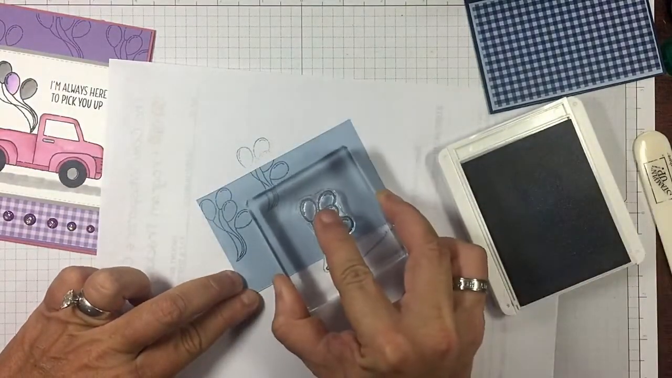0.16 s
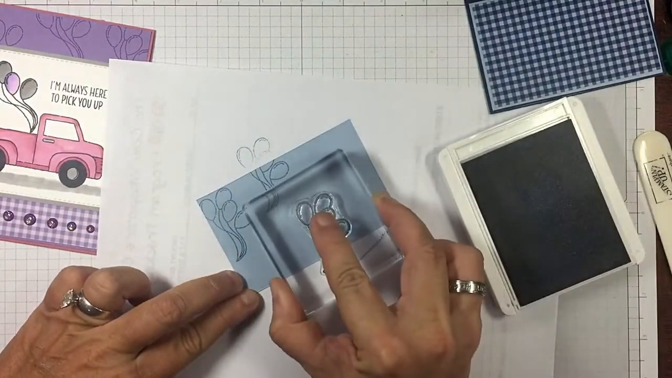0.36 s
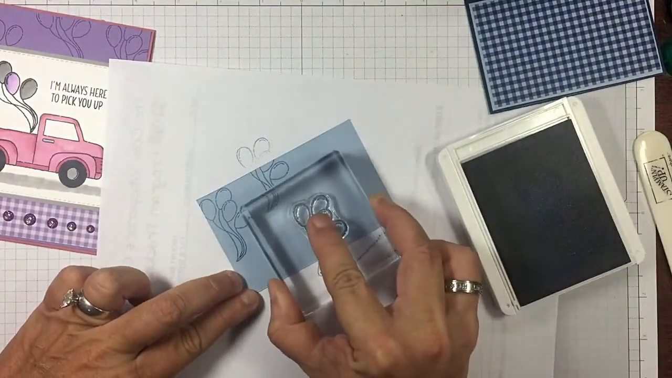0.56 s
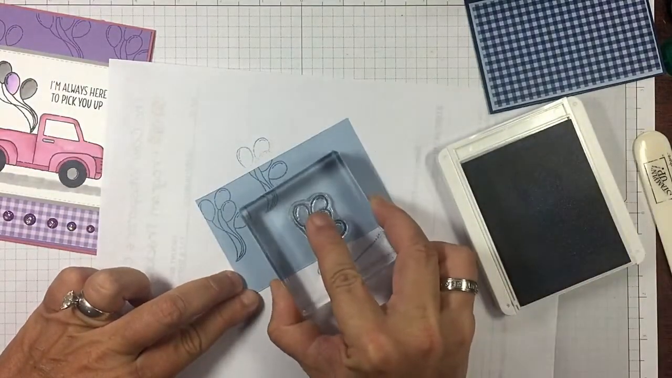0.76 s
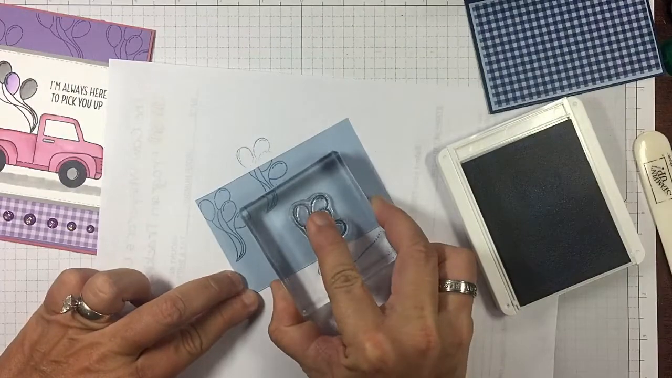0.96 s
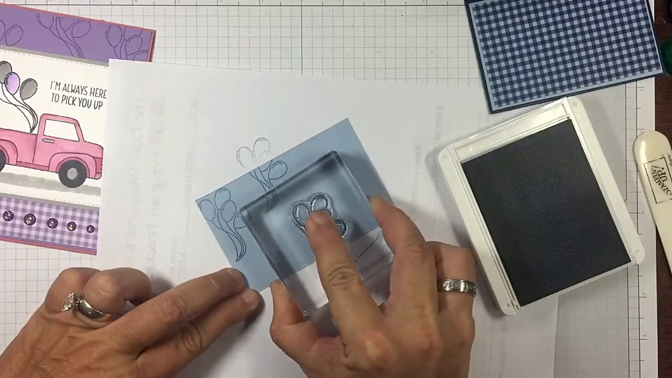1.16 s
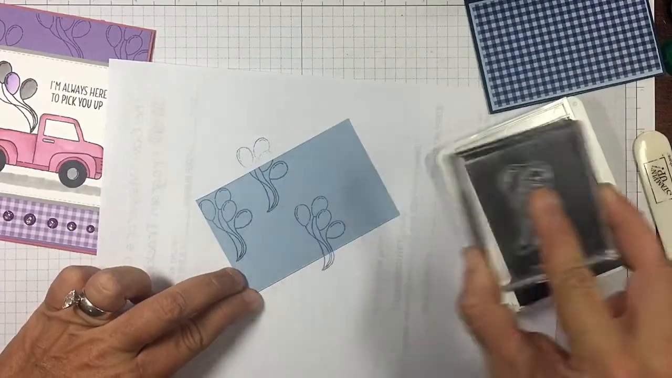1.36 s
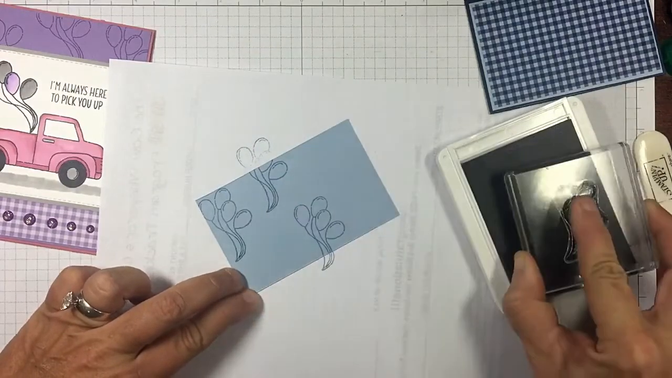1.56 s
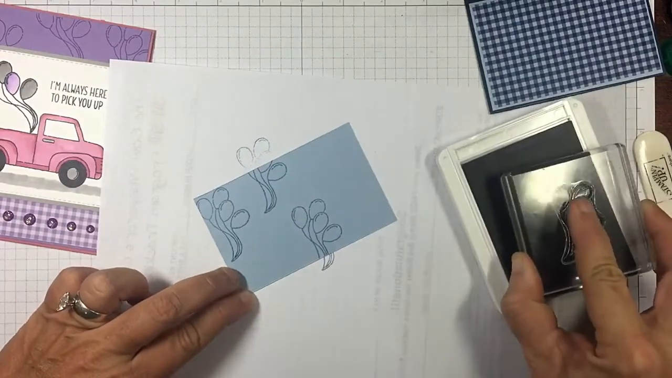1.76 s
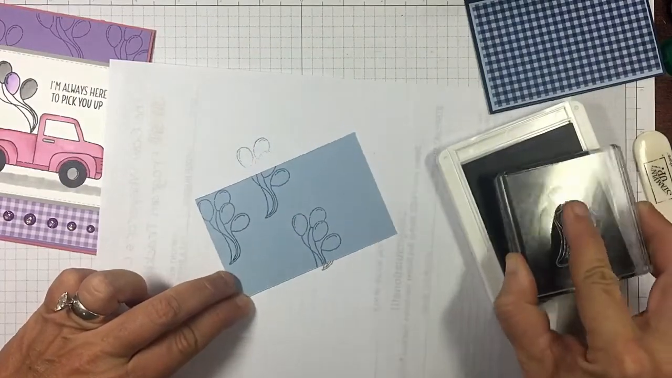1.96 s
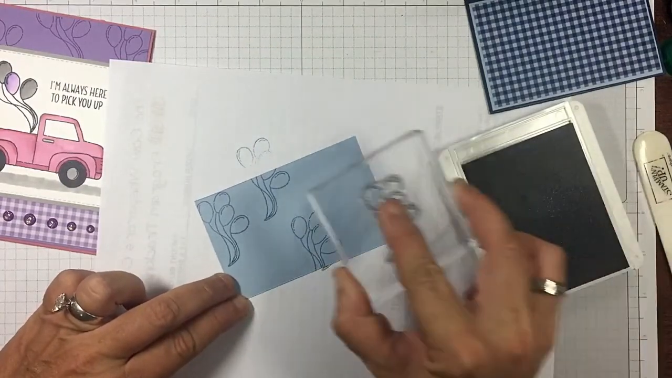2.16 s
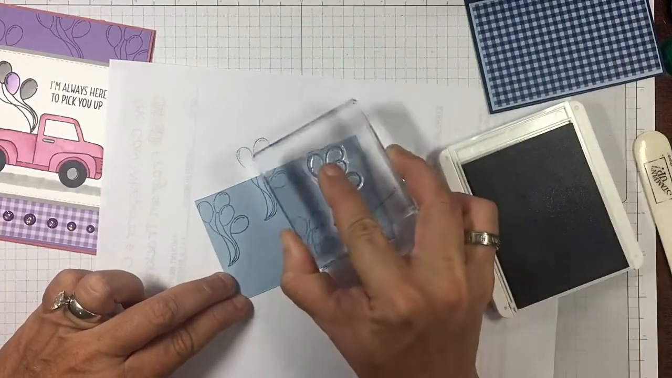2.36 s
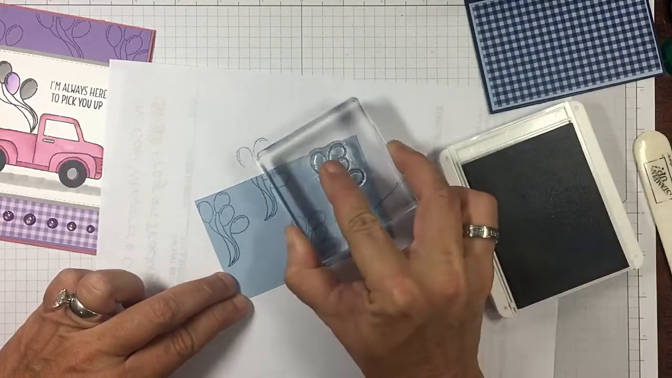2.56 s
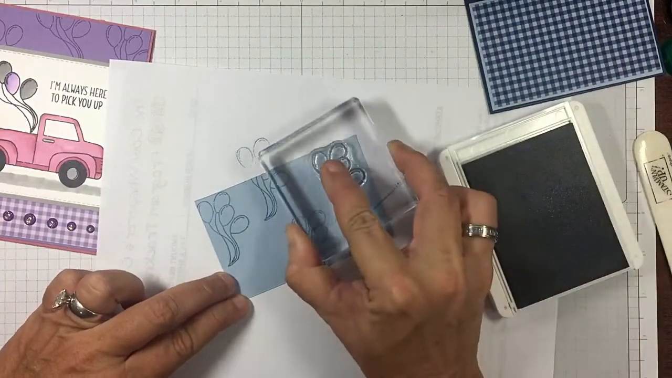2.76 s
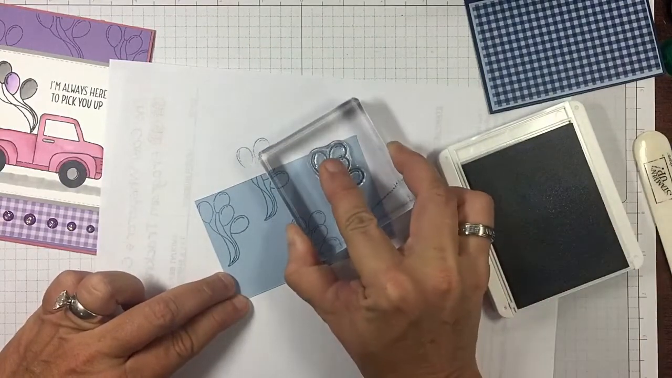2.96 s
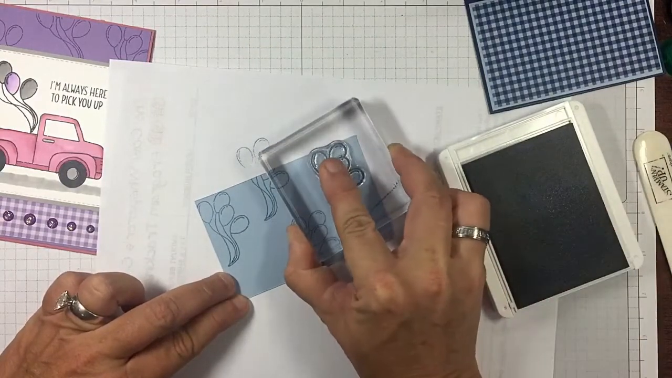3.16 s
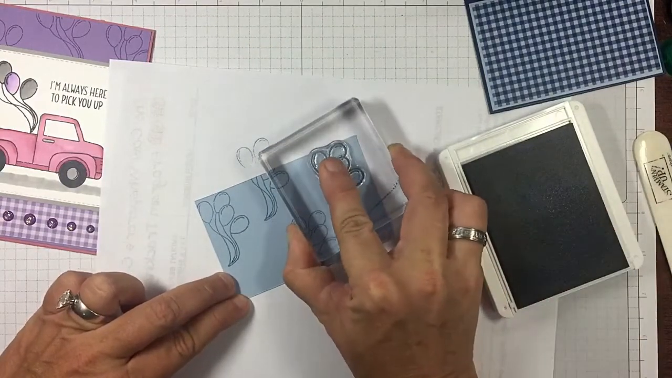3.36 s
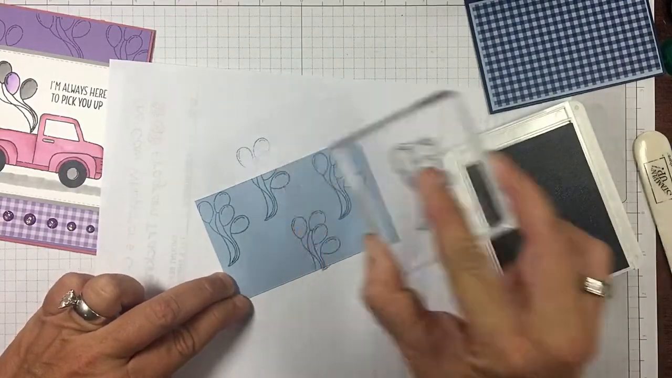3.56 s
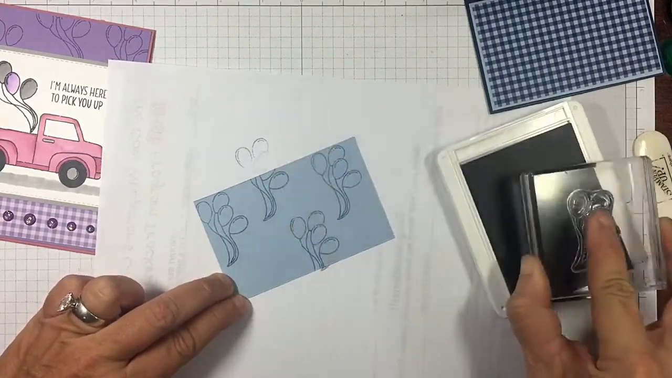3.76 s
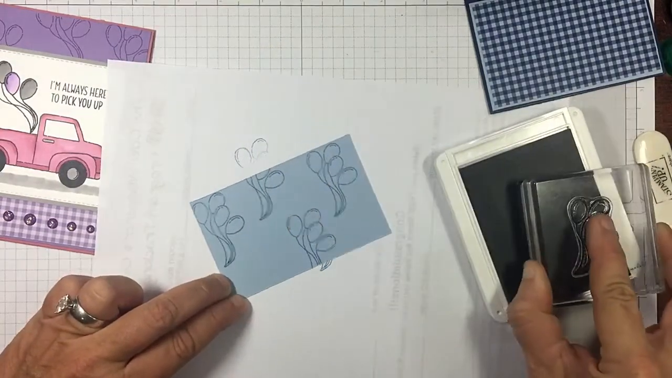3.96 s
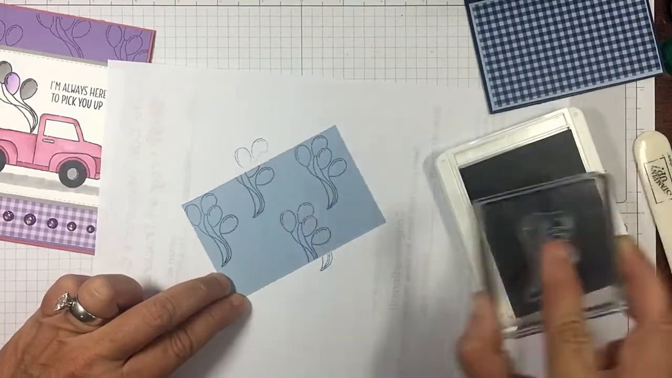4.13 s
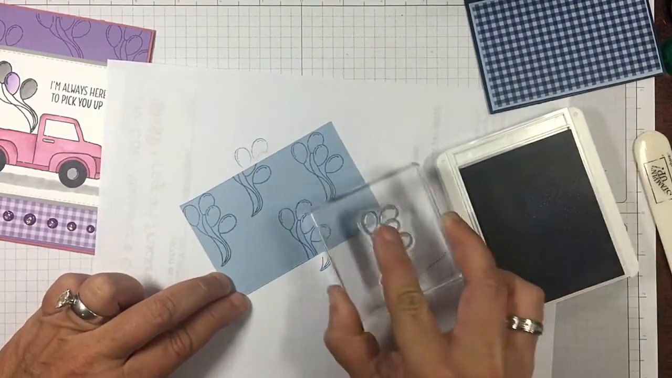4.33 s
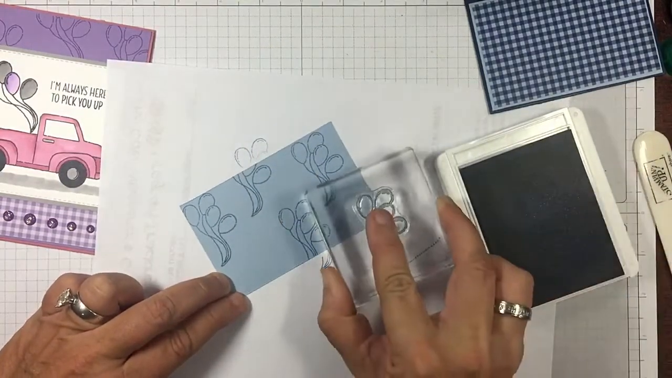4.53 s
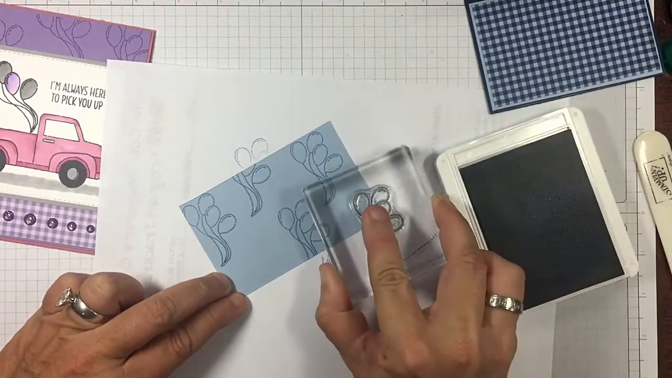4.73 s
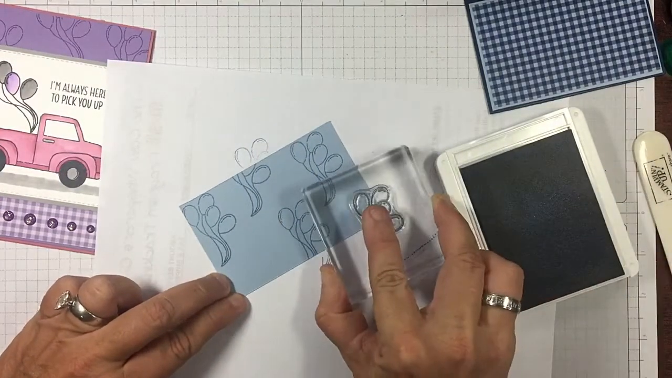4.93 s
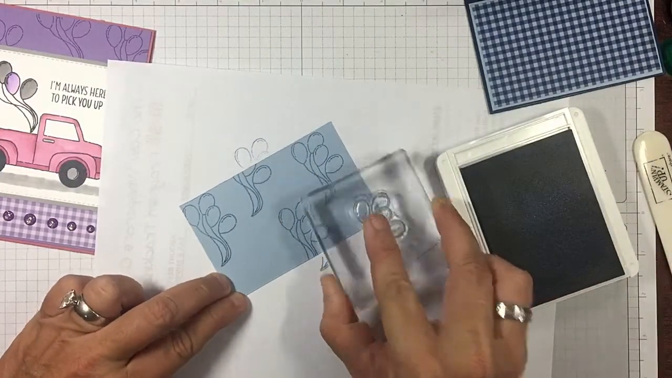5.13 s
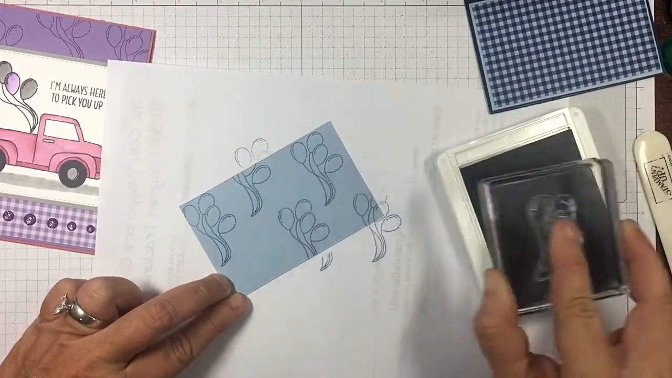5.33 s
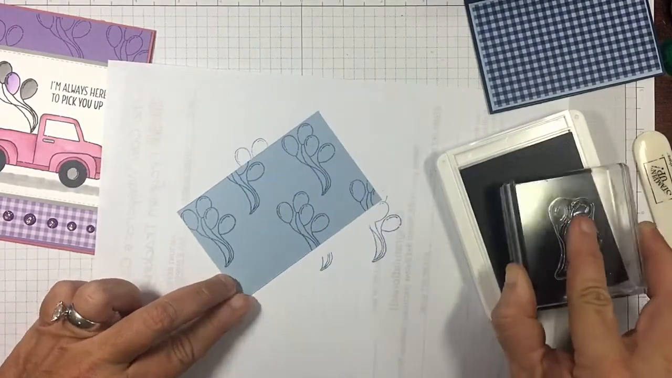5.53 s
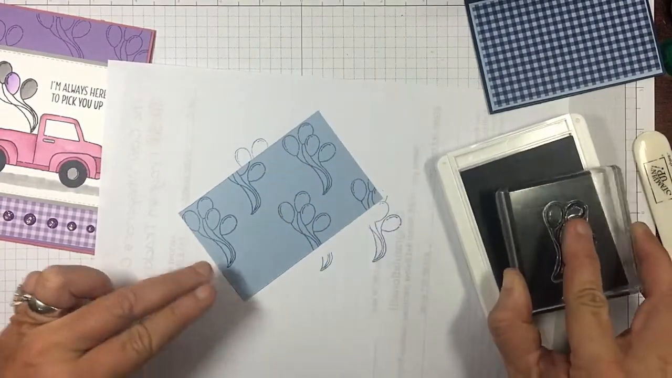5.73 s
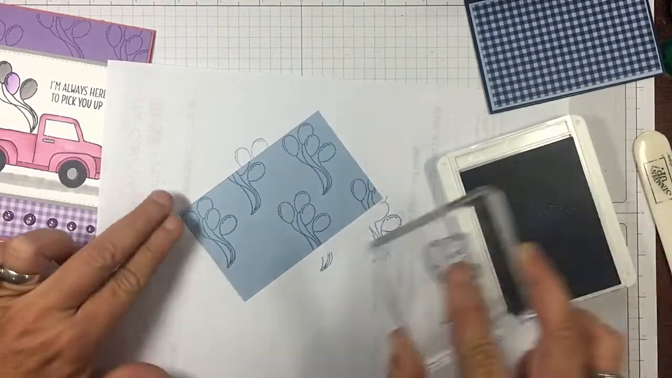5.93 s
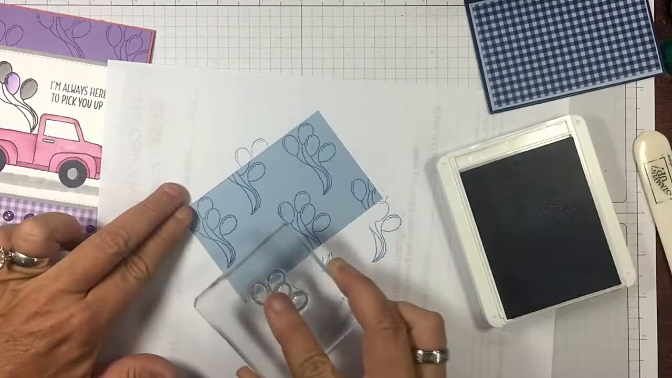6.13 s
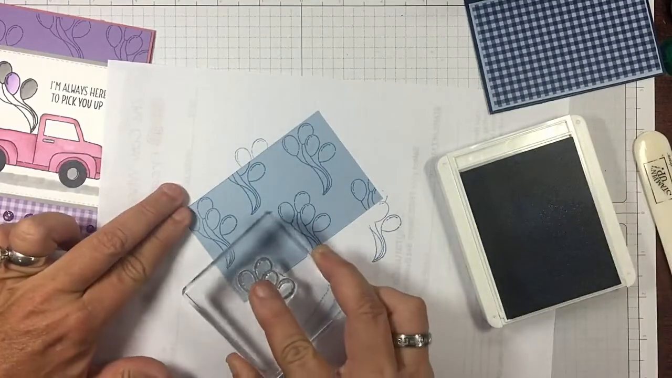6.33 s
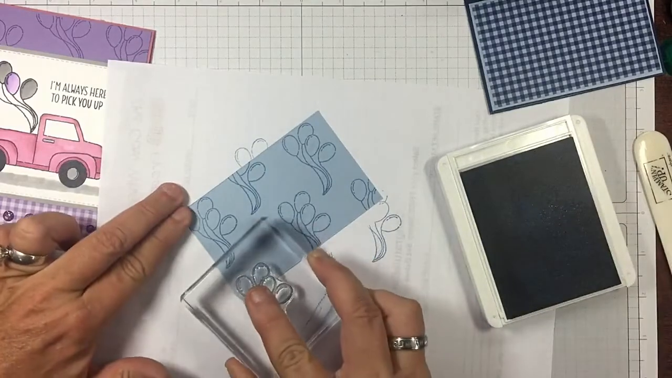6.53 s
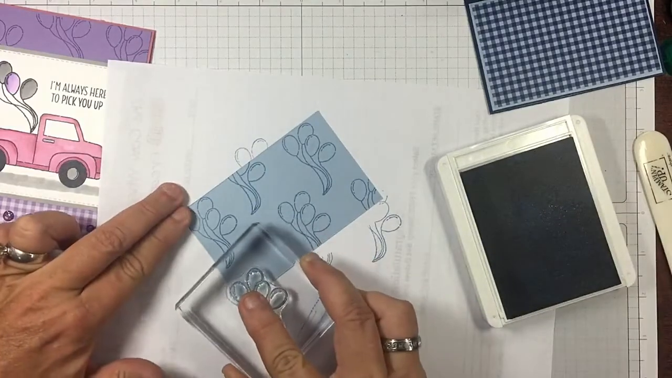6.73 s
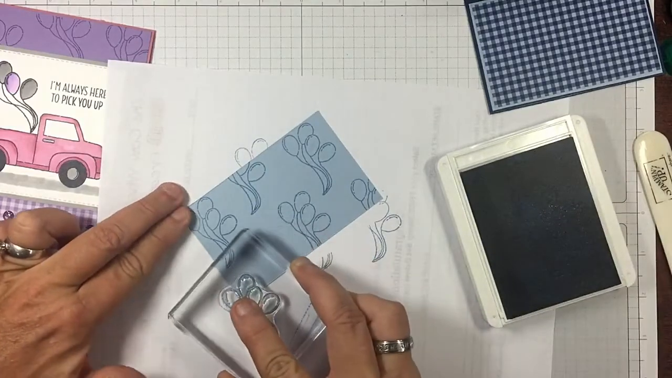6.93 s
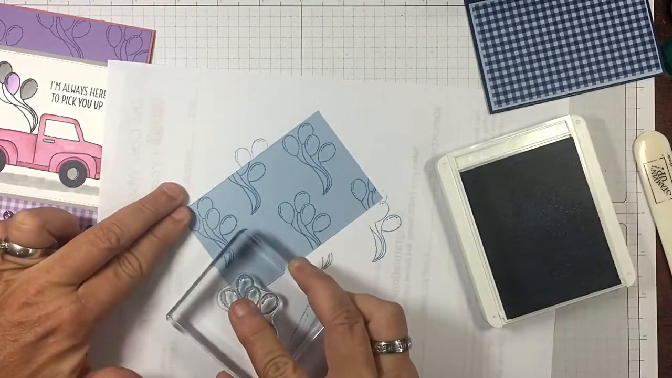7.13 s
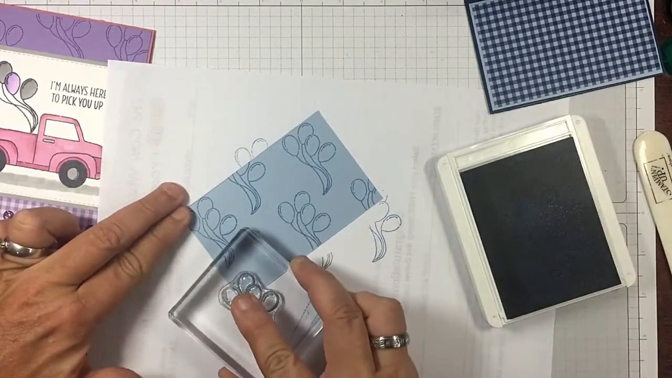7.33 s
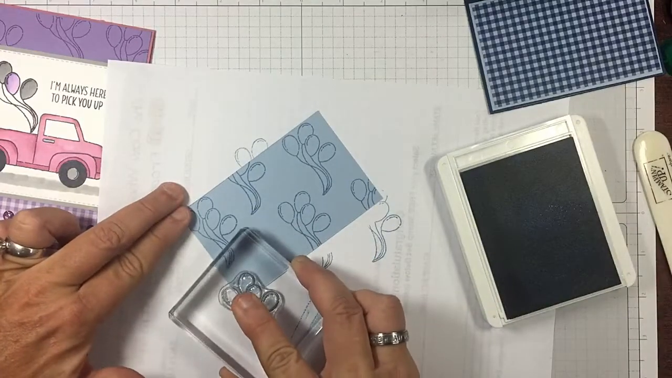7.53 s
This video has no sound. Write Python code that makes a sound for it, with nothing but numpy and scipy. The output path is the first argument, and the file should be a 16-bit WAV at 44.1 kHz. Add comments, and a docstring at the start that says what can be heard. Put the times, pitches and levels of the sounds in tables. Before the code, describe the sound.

Close-miked handwork on a table: a cushioned thud, a tacky snap, three quick clattering plastic taps on an ink pad, a very soft press and crackly release, two more taps, a firm thud and faint peel, three more taps, then a last solid thud. Small scuffs and a tiny wet fizz slip in between. Short room echo, steady quiet hiss beneath.

```python
"""An acrylic stamp block is tapped on a foam ink pad and pressed onto card on a tabletop in a small quiet room.
Taps and lifts knock the pad's plastic case (chirped clicks, ringing modes) and thump the table's damped modes.
On the card the block lands with a dull modal thud; the tacky stamp peels off with crackle and snap clicks.
Small scuffs and fizzes are runs of tiny slips; a low rumble and an even hiss are shaped noise."""
import sys
import numpy as np
from scipy import signal
from scipy.fft import rfft, irfft
from scipy.io import wavfile

SR = 44100
rng = np.random.default_rng(int(sys.argv[2]) if len(sys.argv) > 2 else 0)


def materialize(psi):
    """Save the field psi as 16-bit PCM at rate SR to the path in sys.argv[1].

    A 1-D psi becomes a single channel; in a 2-D psi each row is a channel.
    """
    bounded = np.clip(np.atleast_2d(psi).T, -1, 1)
    quanta = np.round(bounded * 32767).astype(np.int16)
    wavfile.write(sys.argv[1], SR, quanta)


N = 339129
SIZE = 16384  # samples per short sound
TIME, FREQ = np.arange(SIZE) / SR, np.fft.rfftfreq(SIZE, 1 / SR)  # s, Hz

# background noise spectra: (frequency [Hz], relative level [dB])
HISS_SPECTRUM = [(150, -64), (250, -10.5), (292, 0), (324, -3), (359, -4), (398, -8), (525, -5.5),
                 (755, -10), (867, -10.5), (2090, -8.5), (2490, -12), (2900, -11), (4710, -16.5),
                 (13300, -21.5), (15500, -24)]
RUMBLE_SPECTRUM = [(20, -17), (35, -14), (49, -1), (70, -3), (110, -7.5), (150, -12), (200, -13),
                   (250, -15.5), (330, -49)]
HISS_RMS_DB, RUMBLE_RMS_DB = -69.5, -66.5
# decay of the room: (frequency [Hz], t60 [s])
ROOM_DECAY = [(60, 0.85), (110, 0.25), (250, 0.23), (1500, 0.23), (5000, 0.14), (14000, 0.18)]
ROOM_DB, CARD_ROOM_DB = -15.5, -7.5  # thuds on the card stir the room less than the rest
LOW_CUT_HZ, BAND_LIMIT_HZ = 33, 15780

# table modes: (frequency [Hz], level struck under pad [dB], level struck under card [dB], t60 [s])
TABLE_MODES = [(50.6, -8, -54, 0.46), (66.8, -17.5, -54, 0.58), (100.2, 0.5, -2.5, 0.19),
               (108.8, -60, 2, 0.37), (180, -29.5, -2.5, 0.086), (197.3, -2, -4.5, 0.15),
               (275, -4.5, 4, 0.1), (318.4, -10, -13.5, 0.17), (345, -19, -26, 0.15),
               (396, -14, -21.5, 0.18), (438, -14.5, -17, 0.048), (550.5, -13, -20, 0.042),
               (637, -20, -19.5, 0.051)]
SWELL_LAG_S = 0.0063  # the table's low modes take longer to swell than its high ones
# ringing of the pad's plastic case: (frequency [Hz], level [dB], t60 [s])
CASE_RING_MODES = [(765, -4, 0.094), (888, -0.5, 0.078), (1104, -2, 0.092), (1324, 7.5, 0.027),
                   (1410, -4, 0.03), (1670, 2, 0.029), (1894, 6, 0.037)]
# click spectra of the pad's case, of acrylic on case, of the stamp letting go: (frequency [Hz], level [dB])
CASE_SPECTRUM = [(150, -42), (400, 0.5), (600, 3.5), (900, 2), (1020, 3), (1130, 1.5), (1450, 2.5),
                 (1650, -0.5), (1950, -9), (2200, -23.5), (2550, -17), (2900, -50), (8000, -74)]
CLACK_SPECTRUM = [(1500, -6.5), (2450, -59), (2850, 9.5), (3400, 15), (3900, 0), (4450, 13), (5000, -3),
                  (5700, 4), (6600, -22), (14000, -37)]
SNAP_SPECTRUM = [(300, -50), (900, -21), (1300, -3), (1850, -2.5), (2100, -22), (2500, 1), (2850, -1),
                 (3600, 1.5), (4500, -0.5), (5600, -4.5), (6300, -14.5), (8500, -20), (10000, -15.5),
                 (11900, -20), (12800, -45), (16000, -55)]

# case scuffs on the table: (time [s], length [s], level [dB], centre [Hz])
CASE_SCUFFS = [(1.998, 0.024, -59.5, 1350), (4.006, 0.05, -63.5, 1600)]
# bands of the wet foam's fizz: (centre [Hz], level [dB])
FIZZ_BANDS = [(5100, -71), (10500, -72.5)]
FIZZ_AT_S, FIZZ_S = 4.028, 0.041

# stamp peels off the card: (time [s], snap [dB], crackle [dB], squeak time [s], squeak [dB])
STAMP_PEELS = [(1.2547, -23, -37.5, 0.044, -66.5), (3.5304, -33.5, -34, 0.022, -58.5),
               (5.1792, -40, -43, 0.01, -87)]
SQUEAK_HZ = 1500
CRACKLE_S, EVEN_SNAP_DB, GROWTH_PER_DB = 0.011, -34.5, 1.7  # crackle builds before louder snaps, else fades
DROP_LAG_S, DROP_DB, DROP_PER_DB = 0.00936, -49, 0.5  # card's thud after an even peel; growth with the snap
SLIDE_S, SLIDE_REL_SNAP_DB, SLIDE_HZ = 0.063, -43, 1260

# block lands on the card:
# (time of deepest push [s], thud [dB], hardness [dB], edge knock [dB], wait until the hand leans [s])
CARD_PRESSES = [(0.695, -21, -0.5, -40, 0.18), (2.956, -32, -44, -81, 0.25), (4.7782, -18, -2, -50, .127),
                (7.335, -19.5, 6.5, -52, .156)]
EDGE_LEAD_S = 0.015
PRESS_BASS_DB, TICK_REL_THUD_DB = -0.5, -41
LEAN_REL_THUD_DB, LEAN_BASS_DB, LEAN_HARD_DB = -26, 17.5, -7  # leaning rocks the block: a deep bump
GRAZE_AT_S, GRAZE_DB = 4.626, -48.5  # the stamp grazes the card once before it lands

# block lands on the pad:
# (time [s], knock [dB], contact time [s], hollowness [dB], clack [dB], thump [dB])
PAD_TAPS = [(1.5792, -35.5, 0.0066, 5, -63, -24), (1.7827, -25, 0.0056, 2.5, -57, -21),
            (1.9181, -18.5, 0.00023, -5, -54.5, -23.5), (3.8544, -22.5, 0.0027, 2, -40, -20.5),
            (3.9977, -24.5, 0.0023, -1.5, -48, -24), (5.513, -22.5, 0.0048, -1, -44, -18.5),
            (5.6566, -34.5, 0.00298, -8, -67, -26), (5.7833, -33.5, 0.0044, -6, -63, -21)]
# block lifts, pad drops back:
# (time [s], knock [dB], contact time [s], hollowness [dB], thump [dB], bass [dB])
PAD_LIFTS = [(1.693, -38, 0.0064, 4.5, -28, -11), (1.861, -26, 0.00384, 11, -30, -6),
             (2.005, -44, .012, 4, -38.5, -31), (3.9218, -32, 0.00087, 4, -30.5, -11),
             (4.107, -43, 0.011, -2, -34.5, -22), (5.589, -36, .008, 5.5, -28, -2.5),
             (5.728, -36, 0.0095, 7, -29.5, -7), (5.86, -35.5, 0.0094, 1.5, -25.5, -12)]
TAP_LAG_S = 0.0145  # the foam gives way this long before the table takes the push
TAP_THUMP_DB, TAP_BASS_DB, BASS_PER_DB = -24, 5.5, 1  # usual tap and its bass; heavier taps have more
SOFT_KNOCK_DB, HARDNESS_PER_DB = -29.5, 0.9  # louder knocks excite more of the table's upper modes
LIFT_LAG_S, LAG_PER_CONTACT = 0.01303, 0.728  # a slow lift lets the pad down later
LIFT_CLACK_DB = -60


def amp(db):
    """Decibels to gain."""
    return 10 ** (np.asarray(db) / 20)


def unit(x):
    """Scales to energy 1."""
    return x / np.sqrt(np.sum(x ** 2) + 1e-20)


def read(points, hz):
    """Joins (Hz, value) points on a log-frequency axis."""
    f, value = np.transpose(points)
    return np.interp(np.log(hz + 1), np.log(f + 1), value)


def add(mix, s, sound):
    """Mixes a sound in at time s."""
    part = mix[max(round(s * SR), 0):][:len(sound)]
    part += sound[:len(part)]


def noise(points):
    """Steady noise of rms 1 with the given spectrum."""
    shape = amp(read(points, np.fft.rfftfreq(N, 1 / SR)))
    return unit(irfft(rfft(rng.standard_normal(N)) * shape, N)) * np.sqrt(N)


def room(x):
    """Small furnished room: a diffuse noise tail whose treble dies first."""
    source = rng.standard_normal(SIZE) * (TIME > 0.012)
    hz, t, z = signal.stft(source, SR, nperseg=512)
    decay = amp(-60 * t / read(ROOM_DECAY, hz)[:, None])
    tail = signal.istft(z * decay, SR, nperseg=512)[1]
    return signal.fftconvolve(x, unit(tail))[:N]


def click(db, delay_s=0):
    """Causal minimum-phase click of peak 1 with spectrum db; each frequency may have its own delay."""
    log_gain = np.log(amp(np.r_[db, db[-2:0:-1]]))
    minimum_phase = -signal.hilbert(log_gain).imag[:len(db)]
    delay_phase = 2 * np.pi * np.cumsum(delay_s + 0 * FREQ) * SR / SIZE
    wave = irfft(amp(db) * np.exp(1j * (minimum_phase - delay_phase)))
    wave = wave * (TIME < TIME[-1] / 2)
    return wave / abs(wave).max()


def scatter(x, db, t60_s, gap_s):
    """Adds the dense, quickly dying echoes of the things close by."""
    echoes = rng.standard_normal(SIZE) * amp(-60 * TIME / t60_s) * (TIME > gap_s)
    return x + amp(db) * signal.fftconvolve(x, unit(echoes))[:SIZE]


def contacts(length_s, count):
    """Quick run of small uneven touches of random sign, of energy 1."""
    at = (np.arange(count) + rng.random(count)) / count
    train = np.zeros(SIZE)
    strength = rng.uniform(0.69, 1, count) * rng.choice([-1, 1], count)
    train[(at * length_s * SR).astype(int)] = strength
    return unit(train)


def swelling(length_s, rise_db, count):
    """Touches that change by rise_db toward their end: they grow, or fade if it is negative."""
    return unit(contacts(length_s, count) * amp(rise_db * np.minimum(TIME / length_s, 1)))


def rustle(mix, s, length_s, db, hz, octaves):
    """Friction: dense tiny slips that swell and fade in one resonance."""
    distance = np.log2((FREQ + 1) / hz) / (3 * octaves)
    grain = click(-40 * (1 - np.exp(-distance ** 2)))
    slips = contacts(length_s, count=80) * np.sin(np.pi * np.minimum(TIME / length_s, 1))
    add(mix, s, amp(db) * np.sqrt(length_s * SR) * unit(signal.fftconvolve(grain, slips)))


def rustling():
    """The pad's small noises: its case scuffs on the table and its wet foam fizzes."""
    mix = np.zeros(N)
    for s, length_s, db, hz in CASE_SCUFFS:
        rustle(mix, s, length_s, db, hz, octaves=0.15)
    for hz, db in FIZZ_BANDS:
        rustle(mix, FIZZ_AT_S, FIZZ_S, db, hz, octaves=0.33)
    return mix


def thump(mix, s, db, bass_db, hard_db, build_s, on_card, grip_s=0.033, grip_db=-8):
    """A push builds up until about time s, then the table's modes ring; hard pushes have more top."""
    hz, pad_db, card_db, t60_s = np.transpose(TABLE_MODES)[:, :, None]
    lead_s = 0.03
    t = TIME - lead_s
    height = amp((card_db if on_card else pad_db) + bass_db / (1 + (hz / 160) ** 4))
    height = height / height.sum()
    height = height * amp(hard_db * np.clip((hz - 260) / 160, 0, 1))
    late = t - SWELL_LAG_S * (np.sqrt(280 / hz) - 1)
    build_up = np.exp(-(np.minimum(late, 0) / build_s) ** 2)
    decay = amp(-60 * np.maximum(late, 0) / t60_s)
    # the weight of the hand soon damps all but the slow sway of the table
    grip = amp(grip_db * (hz > 80) * (1 - np.exp(-(np.maximum(t, 0) / grip_s) ** 4)))
    phase = rng.standard_normal(hz.shape) * (hz / 380) ** 2  # upper modes depend on the exact spot
    modes = height * build_up * decay * grip * np.cos(2 * np.pi * hz * t + phase)
    add(mix, s - lead_s, amp(db) * modes.sum(0))


def case_ring():
    """Modes of the case, of energy 1; where the block sits on the pad shifts them a little."""
    hz, db, t60_s = np.transpose(CASE_RING_MODES)[:, :, None]
    hz = hz * (1 + 0.028 * rng.standard_normal(hz.shape))
    modes = amp(db - 60 * TIME / t60_s) * np.sin(2 * np.pi * (hz * TIME + rng.random(hz.shape)))
    onset = 1 - np.exp(-TIME / 0.00032)
    return unit(modes.sum(0) * onset)


def knock(mix, s, db, contact_s, hollow_db, brush_db, travel_s=0.003084, brush_s=0.014, ring_db=-10):
    """Hard contact bends the tabletop: high notes outrun low ones, so it chirps downward."""
    delay_s = travel_s * np.maximum(np.sqrt(1000 / (FREQ + 50)) - 0.7, 0)
    hollow = hollow_db * np.exp(-((FREQ - 800) / 250) ** 2)
    wave = click(read(CASE_SPECTRUM, FREQ) + hollow, delay_s)
    ring = unit(signal.fftconvolve(case_ring(), click(hollow))[:SIZE])
    ring = amp(ring_db) * np.linalg.norm(wave) * ring
    # a faint growing brush of small touches leads into the contact
    brush = signal.fftconvolve(wave, swelling(brush_s, rise_db=17.5, count=16))[:SIZE]
    add(mix, s - brush_s, amp(db + brush_db) * brush)
    # a longer contact chatters more
    chatter_share = contact_s / (contact_s + 0.0026)
    chatter = signal.fftconvolve(wave, contacts(contact_s, count=5))[:SIZE]
    wave = (1 - chatter_share) * wave + chatter_share * amp(0.5) * chatter
    add(mix, s, amp(db) * (scatter(wave, db=-9.5, t60_s=0.079, gap_s=0.004) + ring))


def clack(mix, s, db, contact_s):
    """Hard acrylic clicks: one crisp touch and a short rattle."""
    touches = contacts(0.7 * contact_s, count=4) * 0.6 + (TIME == 0)
    wave = signal.fftconvolve(click(read(CLACK_SPECTRUM, FREQ)), unit(touches))[:SIZE]
    add(mix, s, amp(db) * scatter(wave, db=-2.5, t60_s=0.063, gap_s=0.0013))


def hardness(knock_db):
    """How much a knock of this strength brightens the thump after it, in dB."""
    return HARDNESS_PER_DB * (knock_db - SOFT_KNOCK_DB)


def peeling():
    """Tacky ink squeaks and crackles; the stamp snaps free, and the card drops and slides back."""
    mix, snap = np.zeros(N), click(read(SNAP_SPECTRUM, FREQ))
    for s, snap_db, crackle_db, cling_s, squeak_db in STAMP_PEELS:
        tack_db = snap_db - EVEN_SNAP_DB
        rustle(mix, s - cling_s, cling_s, squeak_db, SQUEAK_HZ, octaves=0.21)
        touches = swelling(CRACKLE_S, GROWTH_PER_DB * tack_db, count=40)
        crackle = signal.fftconvolve(snap, touches)[:SIZE]
        add(mix, s - CRACKLE_S, amp(crackle_db) * crackle)
        flutter = scatter(snap, db=-3, t60_s=0.012, gap_s=0.0005)
        add(mix, s, amp(snap_db) * scatter(flutter, db=-7.5, t60_s=0.088, gap_s=0.0016))
        drop_db = DROP_DB + DROP_PER_DB * tack_db
        thump(mix, s + DROP_LAG_S, drop_db, bass_db=-37, hard_db=-2, build_s=0.015, on_card=True)
        rustle(mix, s, SLIDE_S, snap_db + SLIDE_REL_SNAP_DB, SLIDE_HZ, octaves=0.19)
    return mix


def stamping():
    """The soft stamp cushions the landing: faint edge knock and tick, round thud, bump as the hand leans."""
    mix = np.zeros(N)
    for s, thud_db, hard_db, edge_db, wait_s in CARD_PRESSES:
        edge_s = s - EDGE_LEAD_S
        knock(mix, edge_s, edge_db, contact_s=0.00457, hollow_db=1, brush_db=-3.5)
        clack(mix, edge_s, thud_db + TICK_REL_THUD_DB, contact_s=0.0038)
        thump(mix, s, thud_db, PRESS_BASS_DB, hard_db, build_s=0.011, on_card=True,
              grip_s=0.068, grip_db=-38)
        thump(mix, s + wait_s, thud_db + LEAN_REL_THUD_DB, LEAN_BASS_DB, LEAN_HARD_DB,
              build_s=0.0086, on_card=True, grip_s=0.048, grip_db=-8)
    thump(mix, GRAZE_AT_S, GRAZE_DB, bass_db=-16, hard_db=-6, build_s=0.0099, on_card=True)
    return -mix  # card thuds swing opposite to pad taps


def inking():
    """Taps push the table down; lifts let it spring back the other way."""
    mix, rebound = np.zeros((2, N))
    for s, knock_db, contact_s, hollow_db, clack_db, thump_db in PAD_TAPS:
        knock(mix, s, knock_db, contact_s, hollow_db, brush_db=-24)
        clack(mix, s, clack_db, contact_s)
        bass_db = TAP_BASS_DB + BASS_PER_DB * (thump_db - TAP_THUMP_DB)
        thump(mix, s + TAP_LAG_S, thump_db, bass_db, hardness(knock_db), build_s=0.011, on_card=False)
    for s, knock_db, contact_s, hollow_db, thump_db, bass_db in PAD_LIFTS:
        knock(mix, s, knock_db, contact_s, hollow_db, brush_db=-7)
        clack(mix, s, LIFT_CLACK_DB, contact_s)
        lag_s = LIFT_LAG_S + LAG_PER_CONTACT * contact_s
        thump(rebound, s + lag_s, thump_db, bass_db, hardness(knock_db), build_s=0.0084, on_card=False)
    return mix - rebound


def scene():
    """The handwork in its room, over a low rumble and an even hiss."""
    work = inking() + peeling() + rustling()
    thuds = stamping()
    echo = amp(ROOM_DB) * room(work + amp(CARD_ROOM_DB) * thuds)
    hiss = amp(HISS_RMS_DB) * noise(HISS_SPECTRUM)
    rumble = amp(RUMBLE_RMS_DB) * noise(RUMBLE_SPECTRUM)
    return (work + thuds + echo + hiss + rumble)[None]


def record(dry):
    """The microphone's low cut and the band limit."""
    hz = np.fft.rfftfreq(N, 1 / SR)
    cut = irfft(rfft(dry) * (1 - 1 / (1 + (hz / LOW_CUT_HZ) ** 6)), N)
    low_pass = signal.firwin(1023, BAND_LIMIT_HZ, window=("kaiser", 9), fs=SR)
    return signal.oaconvolve(cut, low_pass[None], "same")


dry = scene()
out = record(dry)
materialize(out)
```